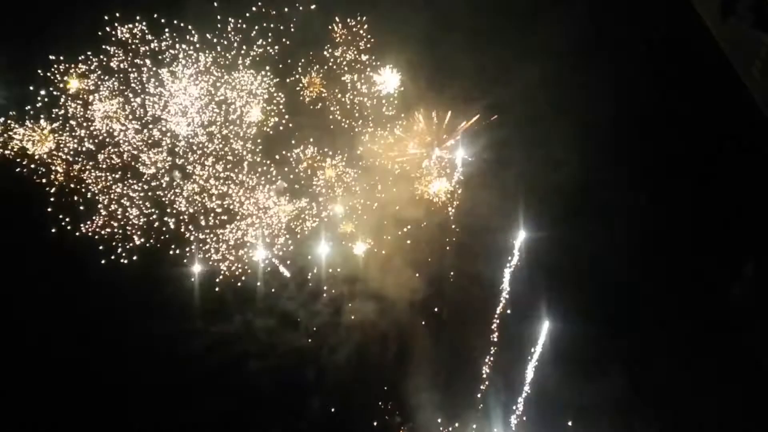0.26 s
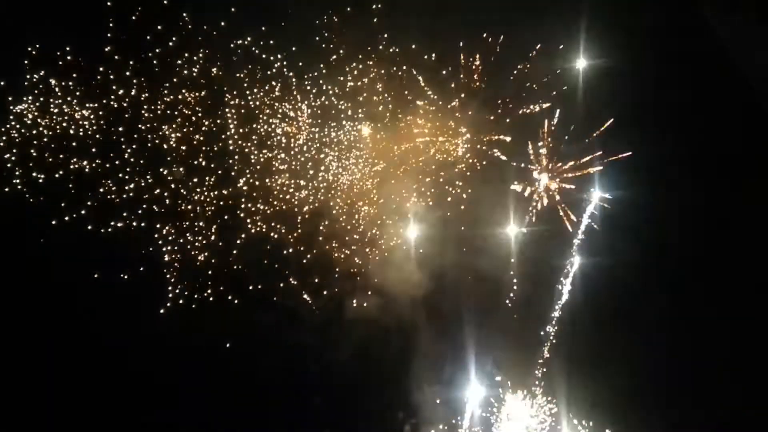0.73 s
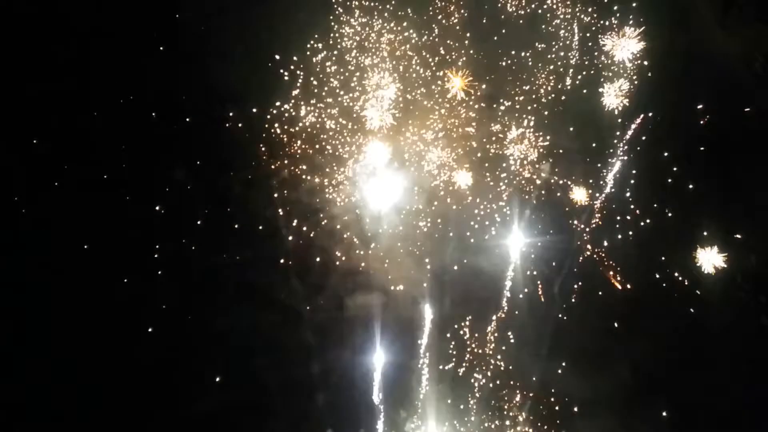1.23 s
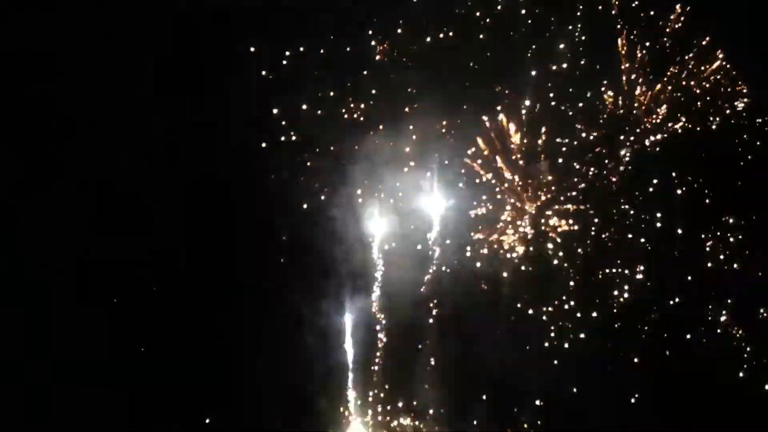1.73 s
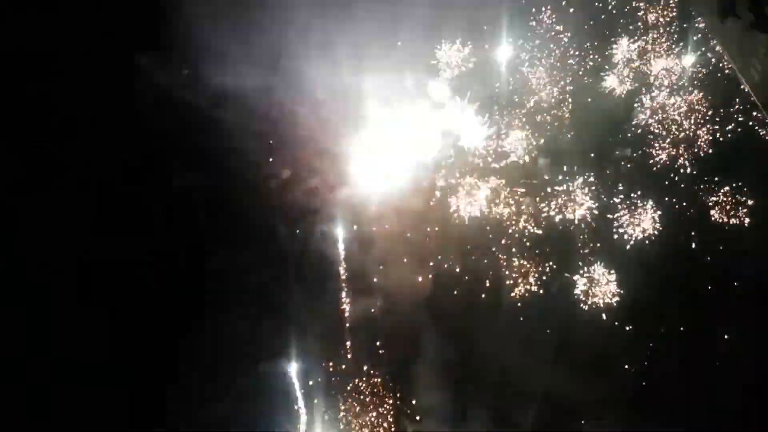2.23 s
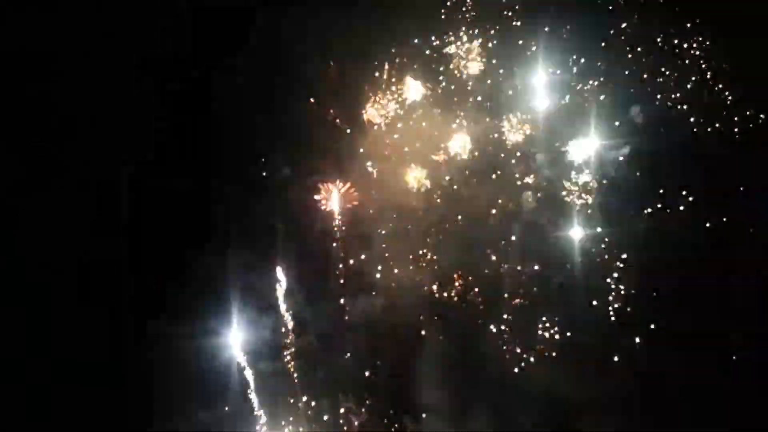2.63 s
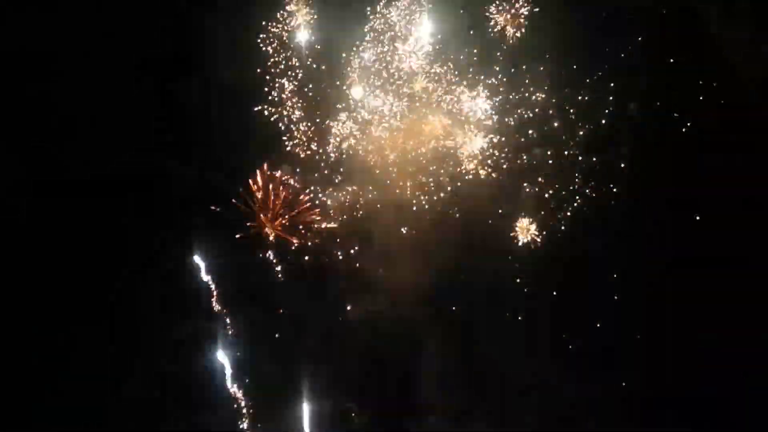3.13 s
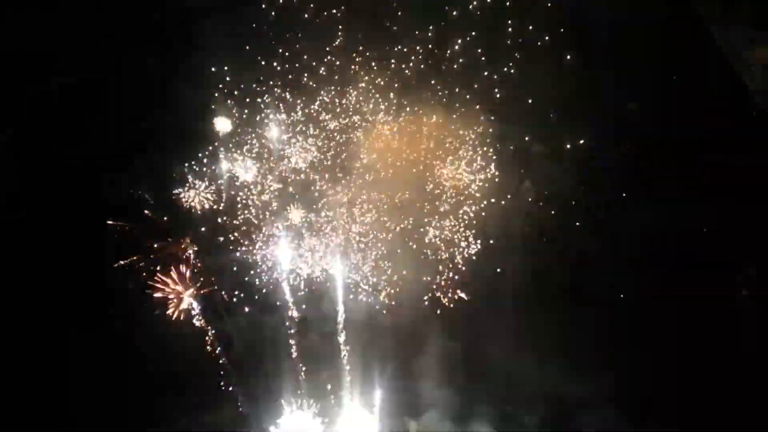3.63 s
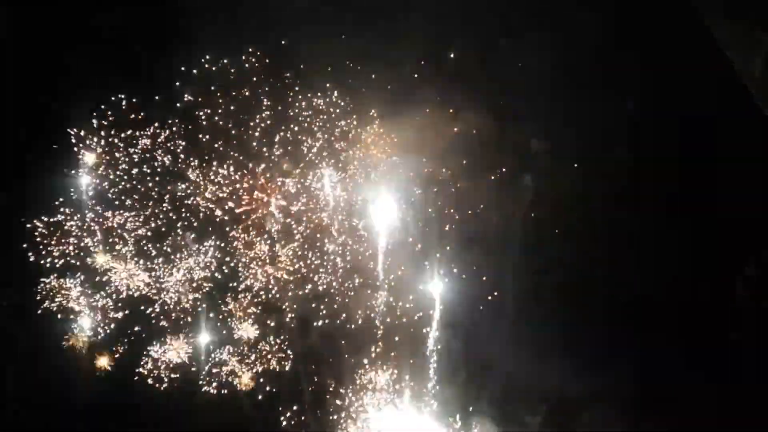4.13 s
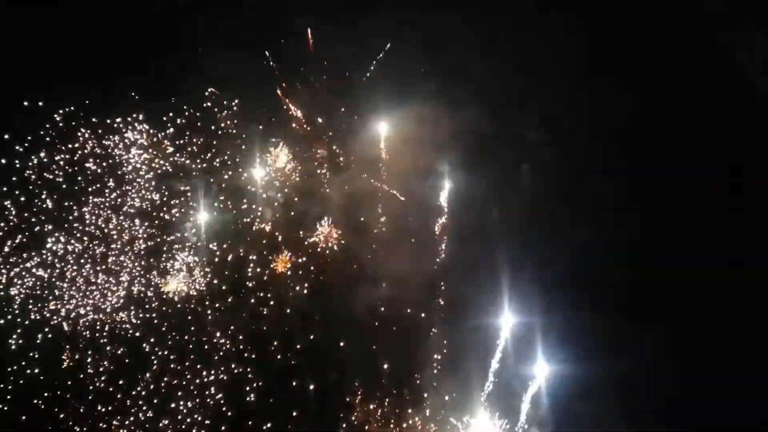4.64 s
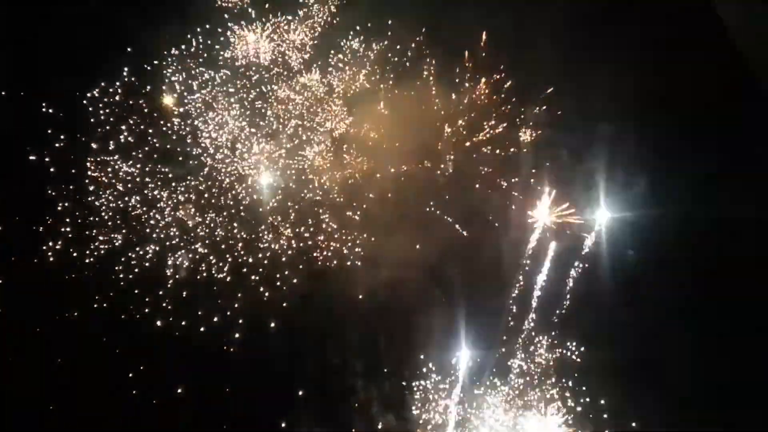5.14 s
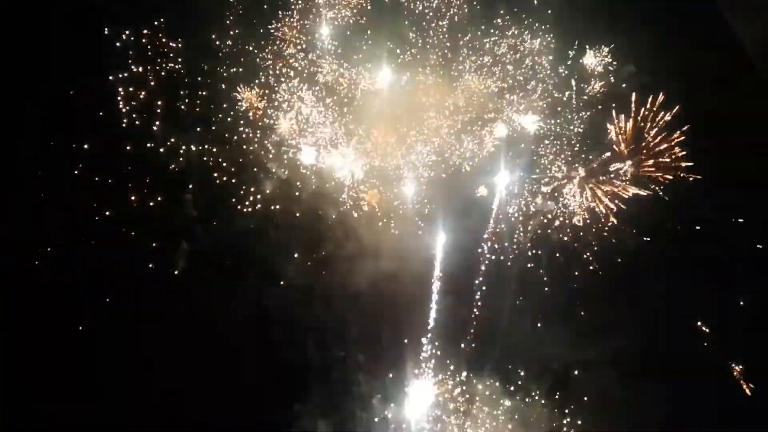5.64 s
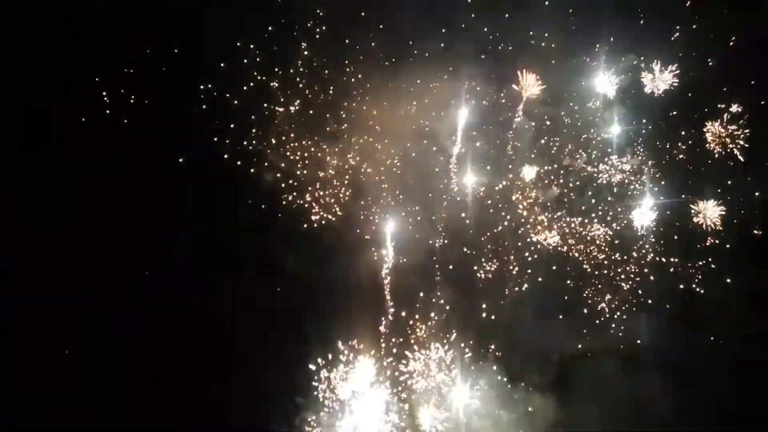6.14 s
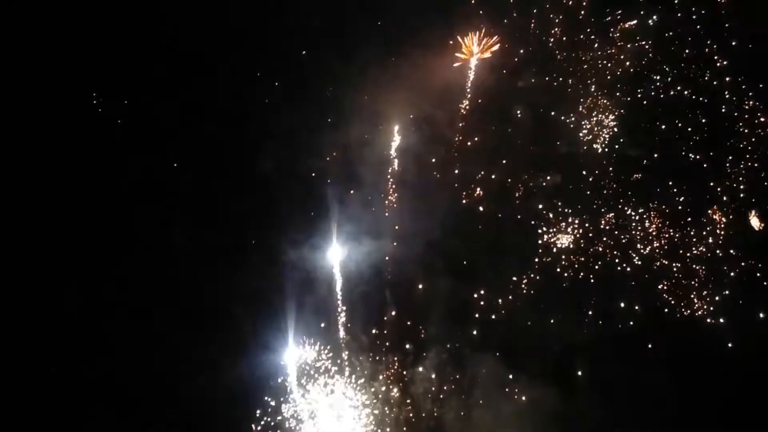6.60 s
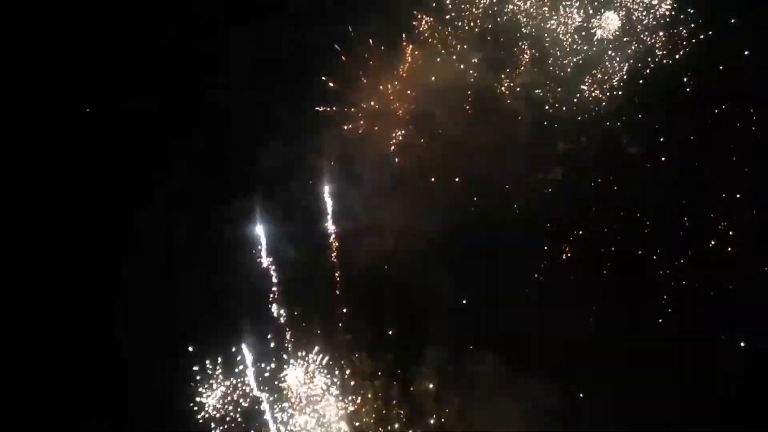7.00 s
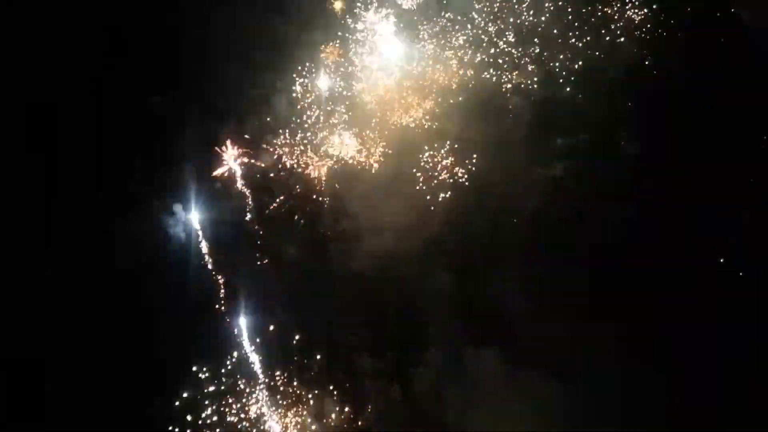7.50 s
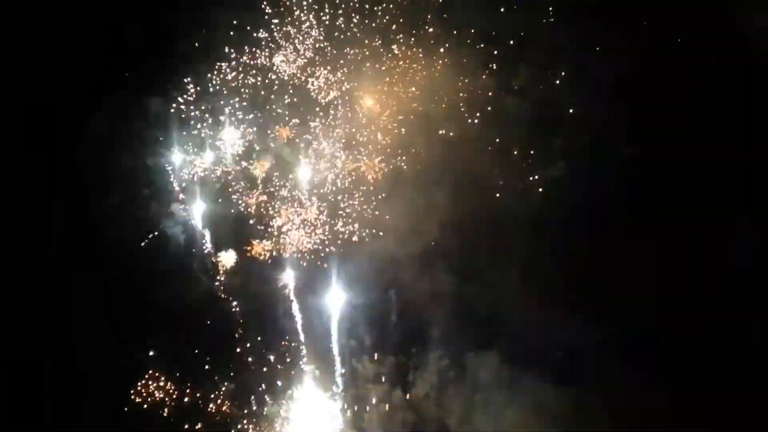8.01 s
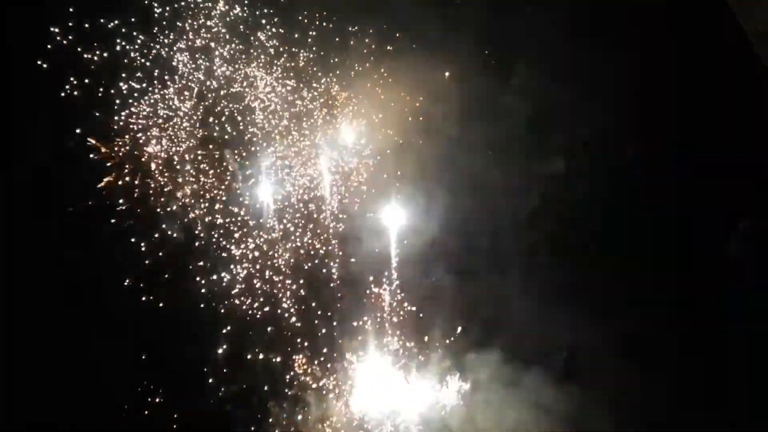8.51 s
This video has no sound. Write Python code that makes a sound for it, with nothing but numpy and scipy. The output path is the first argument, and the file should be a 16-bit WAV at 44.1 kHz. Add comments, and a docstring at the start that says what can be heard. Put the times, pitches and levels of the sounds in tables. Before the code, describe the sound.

Fireworks thump and burst in quick succession, their loud echoing bangs mixed with thick crackle and sharp close snaps.

```python
"""Outdoors among buildings at night, under a dense firework barrage, on a phone's two microphones.
Tubes thump as they launch comets, and shells burst with a hollow bang that rolls round the walls.
Each shell throws out stars that go off about 0.7 s later in a cloud of crackle, a few of them close by.
Further off are dull thuds and a hollow roar; a faint breeze rumbles on the microphones.
The loudest snaps and the first swings of each bang overload the phone and are squared off."""
import sys
import numpy as np
from scipy import signal
from scipy.fft import rfft, irfft
from scipy.io import wavfile
from scipy.ndimage import uniform_filter1d

SR = 44100
rng = np.random.default_rng(int(sys.argv[2]) if len(sys.argv) > 2 else 0)


def waveform_to_disk(signal):
    """Save audio, clipped to [-1, 1], as 16-bit WAV at the path in sys.argv[1]."""
    frames = np.transpose(np.atleast_2d(signal))
    scaled = np.clip(frames, -1, 1) * 32767
    samples = np.round(scaled).astype(np.int16)
    wavfile.write(sys.argv[1], SR, samples)


N = 386316
T = np.arange(N) / SR
STEREO = np.array([[1], [-1]])  # left, right

# Shells overhead. Each row: start in seconds, blast, low punch and echo levels in dB, hollow pitch in Hz,
# star fuse and its spread in seconds, crackle level in dB, its treble in dB relative to the crackle.
SHELL_BURSTS = [(-0.62, -2, -2, -9, 555, .7, .063, -19, 3), (-0.46, -2, -2, -9, 555, .74, .078, -17.5, .5),
                (-0.28, -2, -2, -8, 555, .76, .051, -15.5, 0),
                (0.319, -2.5, 0, -8, 561, .42, .083, -20, -1.5),
                (0.555, -2, 0, -6, 542, .55, .12, -17.3, .5),
                (0.734, -2.5, -6, -12.5, 595, .72, .066, -19.5, 2),
                (0.774, -4.5, -8, -8, 588, .9, .11, -24, -6),
                (1.455, -4.5, -11, -8.5, 577, .69, .08, -22.5, -.5),
                (1.574, -3.5, -2, -11.5, 549, .78, .045, -18.5, -2),
                (1.621, 0, -3, -5.5, 556, .8, .052, -19, 1),
                (1.829, -6.5, -7, -16.5, 553, .78, .025, -21, -5.5),
                (2.118, 1, 0, -6, 537, .69, .057, -18.5, -.5),
                (2.428, -1.5, -2, -8, 523, .71, .09, -17.3, -1),
                (2.791, 0, -1, -8, 516, .78, .069, -17.5, 1),
                (3.155, -1.5, -3, -8.5, 611, .73, .05, -15.3, -1),
                (3.497, -.5, -2, -9, 568, .57, .017, -21, 3.5),
                (3.76, 0, 0, -7.5, 594, .52, .09, -16.8, .5), (4.161, -2, -2, -9, 529, .74, .15, -17.5, 0),
                (4.484, -2.5, 0, -10.5, 602, .74, .025, -20.5, 2),
                (4.889, -2.5, 3, -8.5, 526, .67, .12, -18.7, 0),
                (4.976, -5, 2, -13, 560, .83, .035, -14, -4.5),
                (5.256, 1, -1, -5.5, 544, .76, .053, -19, -1),
                (5.471, -8, -20, -18, 592, .82, .155, -22.5, 2),
                (5.635, -4, -3, -6, 551, .79, .05, -17.8, -4),
                (5.752, -7.5, -14, -17, 523, .9, .066, -22.5, 0),
                (6.051, -10, -10, -25.5, 555, .91, .062, -21, .5),
                (6.293, -2.5, 0, -8, 526, .8, .048, -20.5, -2), (6.734, -1, 1, -7, 570, .68, .046, -21, 1),
                (6.89, -.5, -3.5, -8, 559, .73, .095, -16.7, -.5),
                (7.381, 1, 0, -8, 587, .84, .127, -17, .5), (7.665, -.5, -9, -7, 531, .92, .075, -18, .5),
                (8.368, -.5, -4, -7.5, 566, .72, .06, -18.5, 0),
                (8.454, 1, -2, -9.5, 556, .72, .06, -18.5, 0)]
# Tubes on the ground. Each row: start in seconds, level in dB, offsets in dB for muzzle crack and boom.
TUBE_SHOTS = [(0.118, -6.5, 9, -20), (0.389, -9, 0, -22), (0.685, -8, -4, -24), (0.897, -11, 2, -20),
              (1.232, -14, 4, -24), (1.784, -10.5, 7, -25), (2.073, -9.5, 4, -20), (2.509, -13, -7, -14),
              (2.873, -9, 4, -24), (3.088, -10, 8, -22), (3.394, -9, 4, -15), (3.573, -11, 0, -22),
              (3.95, -10.5, 0, -22), (4.266, -7.5, 3, -24), (4.481, -8, 0, -20), (4.836, -7.5, 5, -18),
              (5.182, -9, 2, -17), (5.573, -12, 4, -26), (5.951, -8, 4, -25), (6.359, -11.5, -4, -27),
              (6.692, -8, 1, -10), (7.113, -8.5, 5, -11), (7.46, -9, 5, -18), (7.695, -7.5, -9, -17),
              (7.954, -7, 4, 0), (8.292, -8.5, -4, -24), (8.515, -13, 0, -18)]
# Walls that return each launch. Each row: delay in seconds, level in dB relative to the thump.
WALL_SLAPS = [(0.058, -6), (0.0645, -8), (0.111, -14), (0.142, -13), (0.207, -12)]
# Stars close by. Each row: start in seconds, level in dB, left minus right in dB.
NEAR_STARS = [(0.016, 0, -0.5), (0.841, 5, 0), (0.938, 6, 1), (0.966, 4, 0), (1.7823, 4, -2),
              (1.7965, 3, 1), (1.801, 3, -1), (1.812, 2, 0), (1.8155, 2, 1), (1.8412, 3, 3),
              (1.8974, 10, -13), (1.9286, 3, 3), (1.935, 4, -2), (1.939, 5, 1), (1.944, 4, 2),
              (1.948, 3, -1), (1.971, 3, 1), (1.976, 2, -2), (1.982, 3, 0), (2.022, 3, 1), (2.027, 3, -1),
              (2.053, 4, -1.5), (2.057, 7, 0), (2.061, 2, 0), (2.736, 5, 0), (3.6621, 2, 1), (3.88, 2, 1),
              (4.0467, 6, -1.5), (4.0857, 12, -1), (5.9857, 8, 3), (6.096, 5, 0), (6.2407, 4, 3),
              (6.814, 4, 0), (7.0115, 3, 2), (7.322, 3, 0), (7.5193, 8, 2), (7.612, 9, -8), (7.817, 5, 0),
              (8.1148, 8, 10), (8.5375, 5, -0.5)]
# Thuds from further off. Each row: start in seconds, peak level in dB, pitch in Hz.
FAR_THUDS = [(0.680, -2, 600), (1.768, -6, 580), (1.815, -5, 620), (1.899, -5, 600), (1.983, -8, 680),
             (2.043, -4, 640), (2.321, -7, 600), (2.985, -6, 600), (5.542, -3, 600), (5.651, -2, 620),
             (5.671, -2, 560), (7.317, -7, 520), (7.989, -6, 580)]

# Spectra of the sources. Each row: frequency in Hz, relative level in dB.
BURST_CRACK = [(300, -6), (2000, 0), (5000, 0), (8000, 3), (10000, -5), (16000, -9)]  # sharp edge of a burst
HOLLOW_ECHO = [(30, -58), (70, -16), (150, -13), (250, -10.3), (390, -7), (470, -2.5), (540, 2.2),
               (650, -1), (800, -4.2), (1000, -10.5), (1300, -24.5), (3000, -35), (12000, -47.5)]  # a burst coming back off the buildings
LOW_THUMP = [(20, -28), (60, -7), (120, -9), (160, -1.5), (200, 1), (300, 0.5), (420, -9), (700, -18),
             (2000, -46)]  # pressure pulse of a launch or burst
MUZZLE_CRACK = [(200, -20), (1000, -24.5), (2800, 4), (4500, -9), (7000, 4), (14000, -8)]  # gas leaving a tube
DEEP_BOOM = [(18, -32), (35, -22), (65, -4), (110, -10), (180, -8), (300, -24.5), (700, -43)]  # tail of a launch
STAR_SNAP = [(60, -34), (300, -1), (800, 2), (1500, 3), (2400, 3.2), (3000, 1.3), (3800, 2.3), (5000, -1.8),
             (6200, -.6), (7400, 2.8), (8200, 4.5), (11000, -4.3), (16000, -9)]  # an exploding star
FAR_ROAR = [(25, -49), (60, -23.5), (120, -15.5), (200, -12.5), (380, -7.5), (480, -2), (550, -.8),
            (640, -3), (800, -2.5), (1000, -8.3), (1400, -21), (4000, -32)]  # distant bursts and echoes
WIND_RUMBLE = [(15, 2), (30, -3), (60, -3), (120, -25), (400, -20)]  # air on the microphones
HOLLOW_HZ = 555  # the shell pitch at which HOLLOW_ECHO is unshifted

# Balance of the two microphone ports. Each row: frequency in Hz, left minus right in dB.
PORT_BALANCE = [(100, 0), (1300, 0.2), (2500, -0.5), (3600, -2.5), (5500, -1), (7500, -3), (10000, 1.5)]
# Response of the phone. Each row: frequency in Hz, gain in dB.
PHONE_RESPONSE = [(20, -9), (55, -2), (100, -2.5), (7400, 2.5), (8000, -6.5), (8600, -12), (9100, -29),
                  (9600, -14.5), (10300, -9), (12000, -11), (15000, -21.5)]


def shells(front_ratio=1.29, ground_ratio=.88, ground_s=.0071, crack_s=.0008):
    """Overhead, a burst cracks and knocks, then comes again off the ground, deeper, with a low punch."""
    out, t, punch = np.zeros((2, N)), T[:2048], pressure_pulse()
    for start, db, punch_db, _, hz, *_ in SHELL_BURSTS:
        bearing, path, detune = rng.standard_normal(3)
        crack = colour(rng.standard_normal((2, len(t))) * np.exp(-t / crack_s), BURST_CRACK)
        add(out, start, undb(2 * db - 8) * crack)  # air takes the crack off the weaker, further shells
        add(out, start, undb(db + 6) * knock(hz * front_ratio, bearing, swell_s=.0011))
        bounce = start + ground_s * (1 + .05 * path)
        bounce_hz = hz * ground_ratio * (1 + .06 * detune)
        add(out, bounce, undb(db + 2) * knock(bounce_hz, bearing, swell_s=.0015))
        add(out, bounce - .001, undb(punch_db - .5) * punch)
    return out


def rolling_echo(rise_s=.007, near_s=.19, t60_s=1.15):
    """Near buildings throw each burst back at its own hollow pitch; weaker far echoes follow."""
    out, age = np.zeros((2, N)), T[:3 * SR // 2]
    far = (1 + np.tanh((age - near_s) / .01)) / 2
    fade = (1 - np.exp(-age / rise_s)) * undb(.6 - .8 * far - 60 * age / t60_s)
    for start, _, _, db, hz, *_ in SHELL_BURSTS:
        echoes = diffuse(scatter(rate=1500, size=len(age)) * fade, apart_hz=594)
        spectrum = np.array(HOLLOW_ECHO) * [hz / HOLLOW_HZ, 1]
        add(out, start, undb(db) * colour(echoes, spectrum))
    return out


def launches(crack_s=.002, thump_lag_s=.0026, boom_t60_s=.28):
    """The lift charge cracks at the muzzle, thumps and booms; walls slap the thump back, duller."""
    out, t, pulse = np.zeros((2, N)), T[:SR // 2], pressure_pulse()
    for start, db, muzzle_db, boom_db in TUBE_SHOTS:
        gas = rng.standard_normal((2, len(t)))
        crack = colour(gas * np.exp(-t / crack_s), MUZZLE_CRACK)
        boom = colour(diffuse(gas, apart_hz=70) * undb(-60 * t / boom_t60_s), DEEP_BOOM)
        add(out, start, undb(db + muzzle_db - 2) * crack)
        add(out, start, undb(db + boom_db - 5) * boom)
        speed = np.exp(.12 * rng.standard_normal())  # no two charges push alike
        push = undb(db + 3.5) * pulse
        thump = np.interp(t * speed, T[:len(push)], push, right=0)
        slap = np.interp(t * speed * .88, T[:len(push)], push, right=0)  # stretched, so duller
        add(out, start + thump_lag_s, thump)
        for delay_s, wall_db in WALL_SLAPS:
            shift_s = .002 * rng.standard_normal()  # each tube stands a little apart
            add(out, start + thump_lag_s + delay_s + shift_s, undb(wall_db) * slap)
    return out


def star_clouds(stray_db=-27, late_stretch=1.68):
    """Crackle and treble levels in dB: stars go off as their fuses burn through, some early, more late."""
    power = np.full((2, N), undb(stray_db) ** 2)  # stray stars between the clouds
    for start, *_, fuse_s, spread_s, db, bright_db in SHELL_BURSTS:
        late = T - start - fuse_s
        width = spread_s * np.where(late > 0, late_stretch, 1)
        cloud = (T > start) * np.exp(-(late / width) ** 2 / 2)
        power += cloud * undb([[db], [db + bright_db]]) ** 2
    return 10 * np.log10(power)


def crackle(level_db, treble_db, gain_db=4.5, wash_s=.043, max_stars=16000):
    """Stars overhead go off in flurries, faster in a thick cloud; their echoes merge into a wash."""
    density = undb(1.4 * (treble_db - np.mean(treble_db)))
    rate = 520 * density * undb(.8 * walk(rate=30))
    at = np.searchsorted(np.cumsum(rate) / SR, np.cumsum(rng.exponential(size=max_stars)))
    at = at[at < N]
    strength, lean = rng.standard_normal((2, len(at)))
    size = undb(7 * np.minimum(strength, 1.5))
    direct = unit(snaps(at, size, pan_db=5 * lean) / np.sqrt(density))
    decay = np.exp(-1 / (wash_s * SR))  # every star has its own echo paths, so only energy adds up
    lingering = signal.lfilter([1 - decay], [1, -decay], np.mean(direct ** 2, axis=0))
    wash = rng.standard_normal((2, N)) * np.sqrt(lingering) * undb(-1.9)
    cloud = unit(colour(direct + wash, STAR_SNAP))
    treble = signal.sosfiltfilt(signal.butter(2, 4000, "high", fs=SR, output="sos"), cloud)
    return (cloud - treble) * undb(level_db + gain_db) + treble * undb(treble_db + gain_db)


def near_stars(gain_db=5.5):
    """Single stars explode close to the microphones and stand out of the crackle."""
    start, db, pan_db = np.transpose(NEAR_STARS)
    return colour(snaps(start * SR, undb(db + gain_db), pan_db), STAR_SNAP)


def far_thuds():
    """From further off, bursts and strong single echoes arrive as a bare knock."""
    out = np.zeros((2, N))
    for start, db, hz in FAR_THUDS:
        add(out, start, undb(db) * knock(hz, bearing=rng.standard_normal(), swell_s=.0014))
    return out


def far_roar(level_db=-16.6):
    """In the distance, bursts and old echoes blend into a hollow, uneven roar."""
    echoes = diffuse(scatter(rate=900), apart_hz=556)
    return colour(echoes, FAR_ROAR) * undb(level_db + .4 * walk(rate=22))


def breeze(level_db=-38.5):
    """Moving air rumbles faintly, right on each microphone port."""
    return colour(rng.standard_normal((2, N)), WIND_RUMBLE) * undb(level_db + 1.4 * walk(rate=5))


def knock(hz, bearing, swell_s):
    """A few round swings of pressure that peak after swell_s; bearing sets the lag between the ports."""
    age = np.maximum(T[:2048] - .00007 * (bearing * STEREO + 2), 0)
    return -np.sin(2 * np.pi * hz * age) * age / swell_s * np.exp(1 - age / swell_s)


def pressure_pulse():
    """A low pulse of peak 1: a short suction, then the swing back."""
    pulse = signal.lfilter(*signal.butter(1, 70, "high", fs=SR), response(LOW_THUMP))
    return -pulse / np.abs(pulse).max()


def snaps(at, size, pan_db, lag_s=.00006, ring_s=.00025):
    """Stars explode at samples 'at': each a front, a suction, a quick reflection and a brief ring."""
    suction_lag = rng.uniform(.00012, .00052, len(at)) * SR
    reflection_lag = suction_lag + rng.uniform(0, .002, len(at)) * SR
    port_lag = rng.uniform(-lag_s, lag_s, len(at)) * SR
    ring_hz = rng.uniform(1200, 8500, (len(at), 1))
    k = np.arange(int(4 * ring_s * SR))
    ring = .17 * np.sin(2 * np.pi * ring_hz * k / SR) * np.exp(-k / (ring_s * SR))
    out = np.zeros((2, N + 1))
    for port, sign in zip(out, (1, -1)):
        start, gain = at + sign * port_lag, size * undb(sign * pan_db / 2)
        for lag, share in ((0, 1), (suction_lag, -.4), (reflection_lag, .25)):
            np.add.at(port, np.clip(start + lag, 0, N).astype(int), share * gain)
        np.add.at(port, np.clip(start[:, None] + k, 0, N).astype(int), gain[:, None] * ring)
    return out[:, :N]


def scatter(rate, size=N):
    """Two unrelated trains of reflections, about rate a second, power 1."""
    share = rate / SR
    return rng.standard_normal((2, size)) * (rng.random((2, size)) < share) / np.sqrt(share)


def diffuse(pair, apart_hz):
    """Sound from all sides: both ports hear the same bass and differ above apart_hz."""
    low, high = (signal.butter(1, apart_hz, kind, fs=SR) for kind in ("low", "high"))
    side = signal.lfilter(*high, pair[1])
    mid = pair[0] + (np.sqrt(2) - 1) * signal.lfilter(*low, pair[0])
    return (mid + side * STEREO) / np.sqrt(2)


def walk(rate):
    """Random levels held 1 / rate s and slewed; spread near 1."""
    hold = int(SR / rate)
    return uniform_filter1d(rng.standard_normal(N // hold + 1)[np.arange(N) // hold], hold)


def undb(db):
    """Decibels to gain."""
    return 10 ** (np.asarray(db) / 20)


def unit(x):
    """Scale to rms 1."""
    return x / np.sqrt(np.mean(x ** 2))


def response(points, size=2048):
    """Causal impulse response with the given (Hz, dB) spectrum."""
    hz, db = np.transpose(points)
    bins = np.maximum(np.arange(size // 2 + 1) * SR / size, 1)
    gain = undb(np.interp(np.log(bins), np.log(hz), db))
    cepstrum = irfft(np.log(gain))
    cepstrum[1:size // 2] *= 2
    cepstrum[size // 2 + 1:] = 0
    return irfft(np.exp(rfft(cepstrum)))


def through(x, ir):
    """Convolve each channel, keeping the length."""
    return signal.fftconvolve(np.atleast_2d(x), np.atleast_2d(ir), axes=1)[:, :np.shape(x)[-1]]


def colour(x, points):
    """Filter by a spectrum; white noise keeps its power."""
    ir = response(points)
    return through(x, ir / np.linalg.norm(ir))


def add(out, start_s, sound):
    """Mix a sound in at start_s."""
    i = int(start_s * SR)
    part = sound[..., max(-i, 0):max(N - i, 0)]
    out[..., max(i, 0):max(i, 0) + part.shape[-1]] += part


def overload(x, ceiling, hardness):
    """Squash the peaks under a ceiling; more hardness squares them off."""
    return x / (1 + (x / ceiling) ** hardness) ** (1 / hardness)


def scene():
    """Launches, bursts and their echoes under the crackling sky, as they reach the phone."""
    bangs = launches() + shells() + rolling_echo()
    stars = crackle(*star_clouds()) + near_stars()
    return bangs + stars + far_thuds() + far_roar() + breeze()


def record(dry, top_hz=15700):
    """The phone: port colour, soft clipping, a dull top and a hard knee just under full scale."""
    hz, balance_db = np.transpose(PORT_BALANCE)
    ports = np.array([response(np.c_[hz, sign * balance_db / 2]) for sign in (1, -1)])
    x = overload(through(dry, ports), ceiling=.83, hardness=6)
    x = overload(through(x, response(PHONE_RESPONSE)), ceiling=.93, hardness=12)
    return signal.sosfilt(signal.ellip(8, .2, 70, top_hz, fs=SR, output="sos"), x)


dry = scene()
out = record(dry)
waveform_to_disk(out)
```